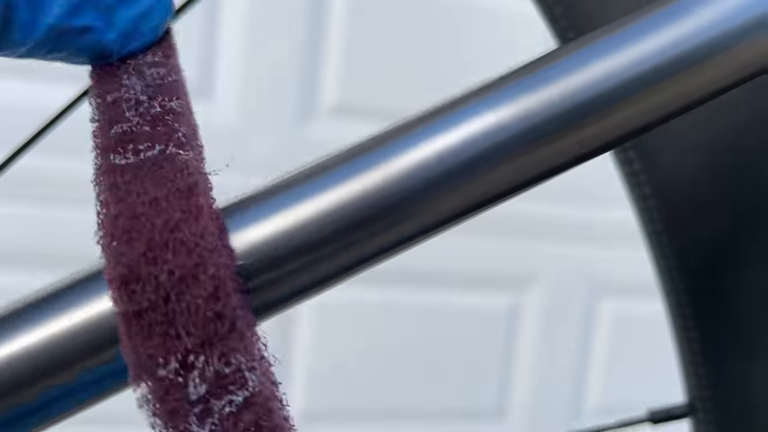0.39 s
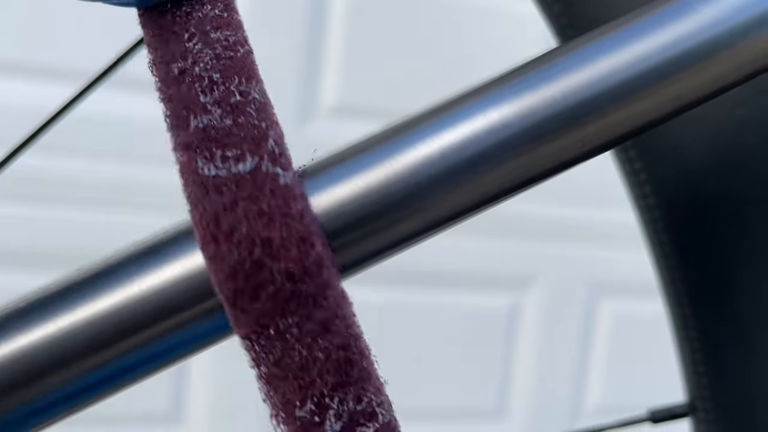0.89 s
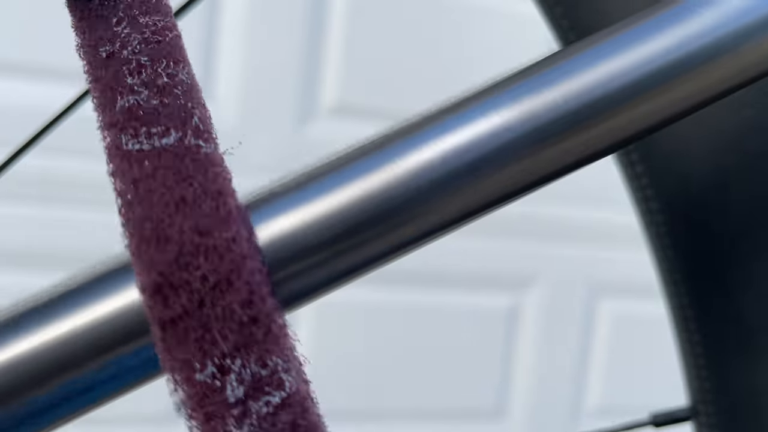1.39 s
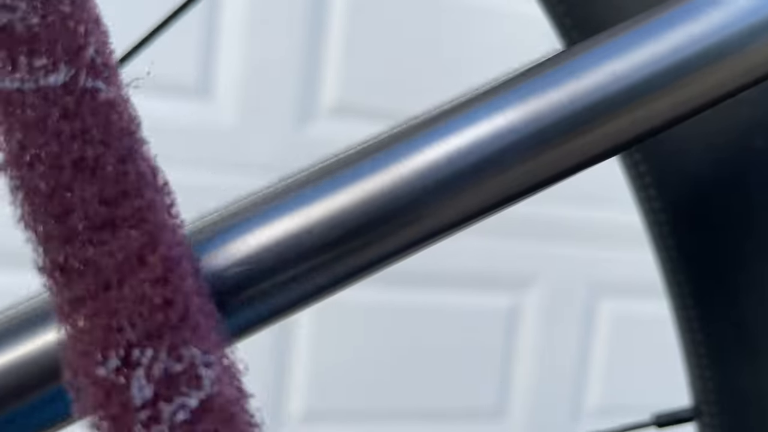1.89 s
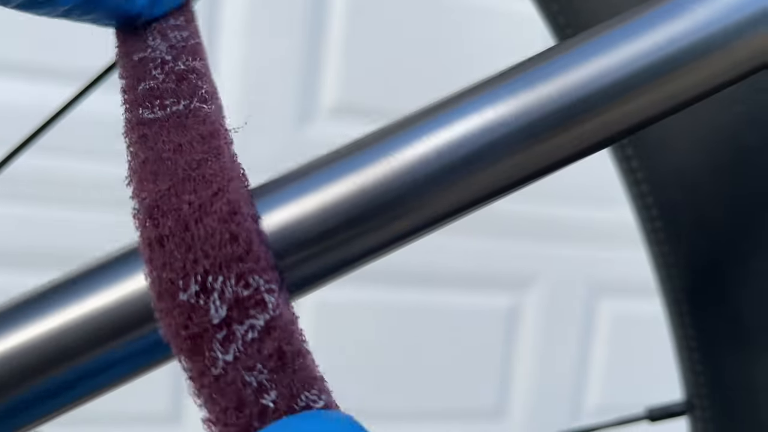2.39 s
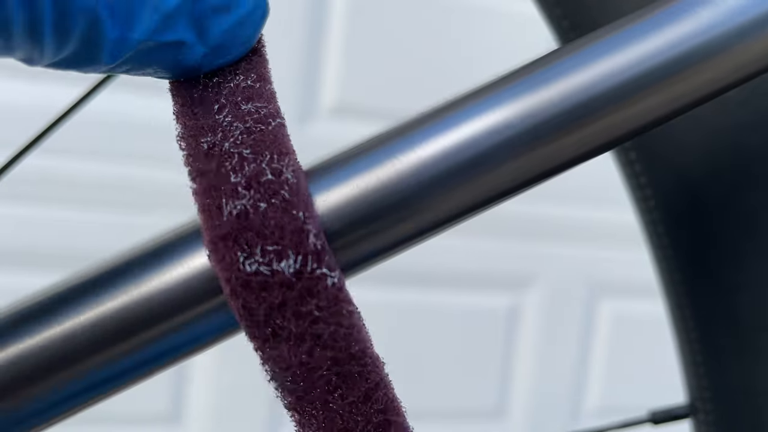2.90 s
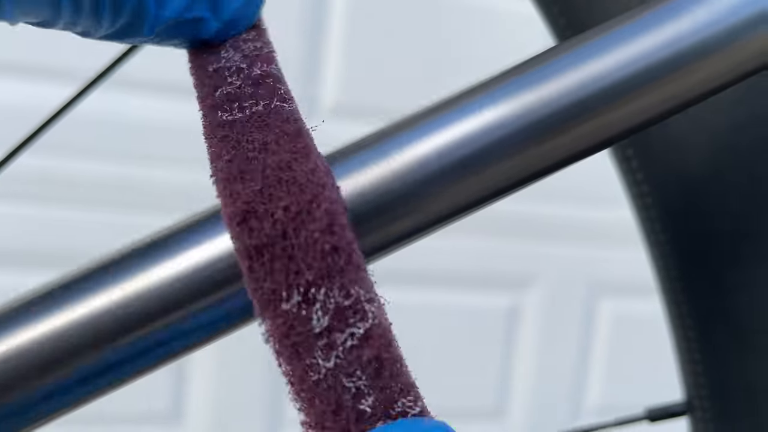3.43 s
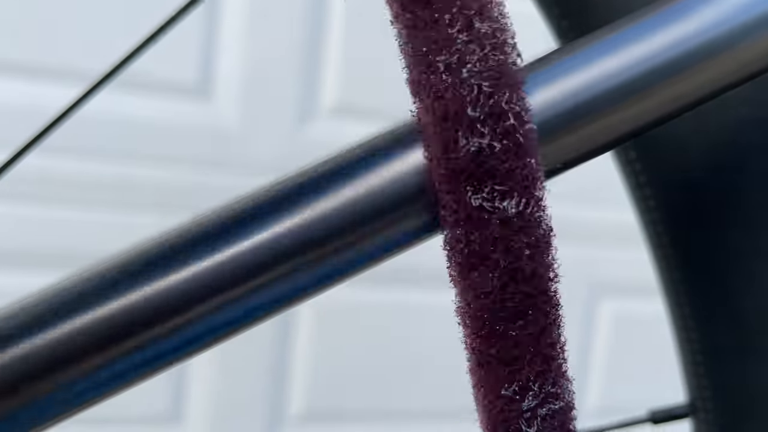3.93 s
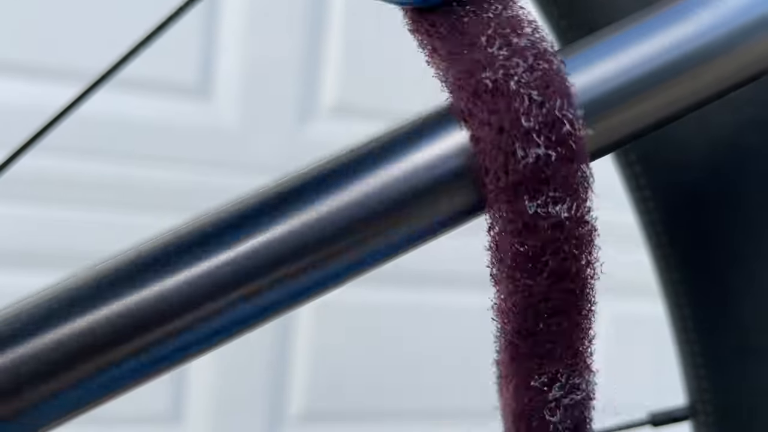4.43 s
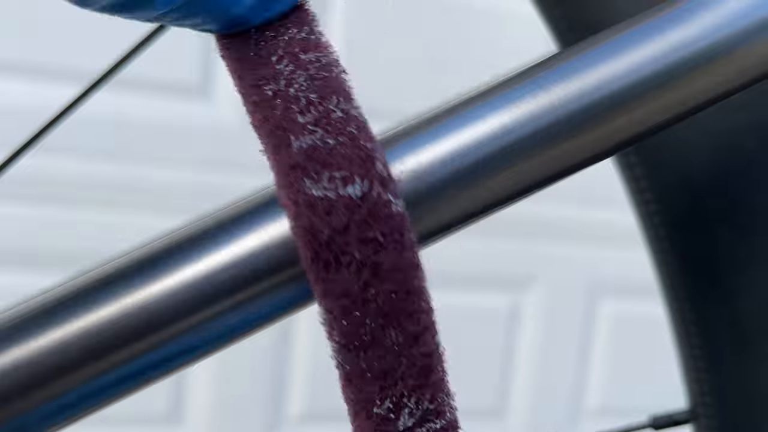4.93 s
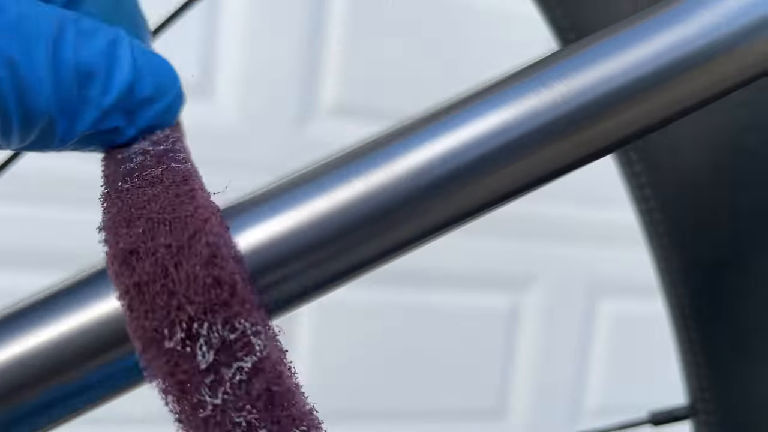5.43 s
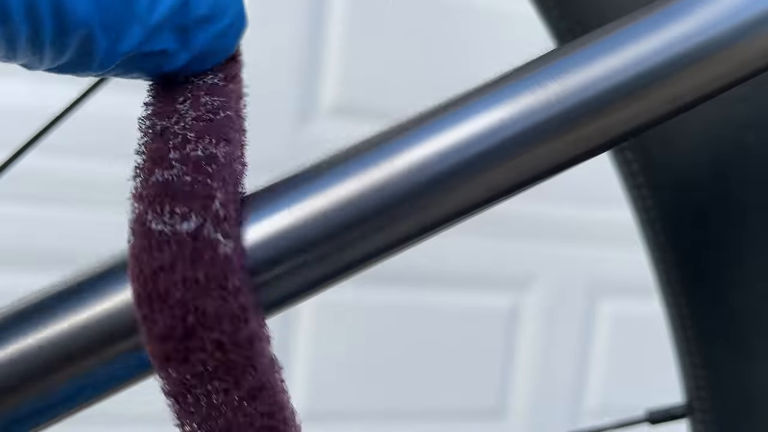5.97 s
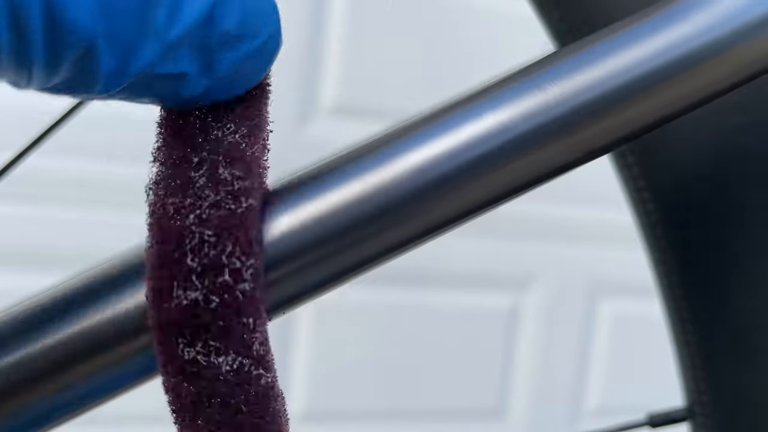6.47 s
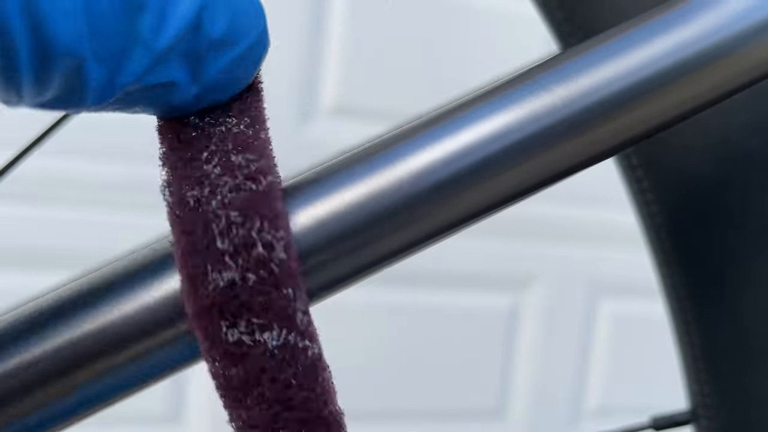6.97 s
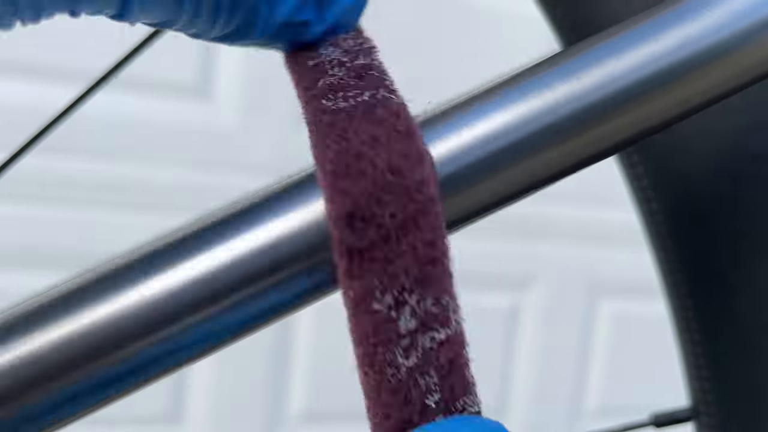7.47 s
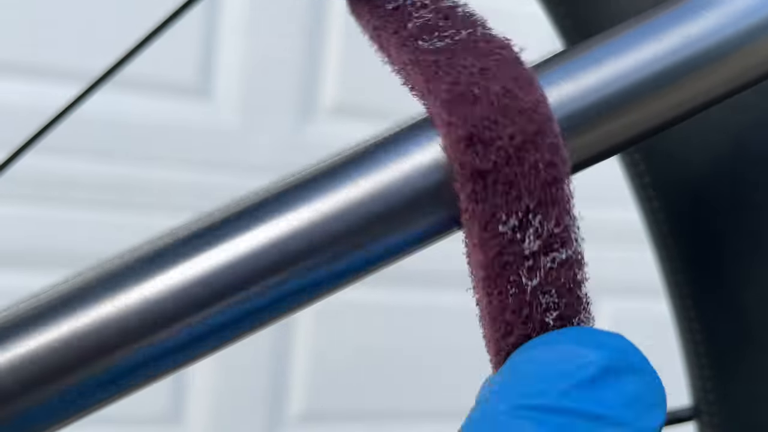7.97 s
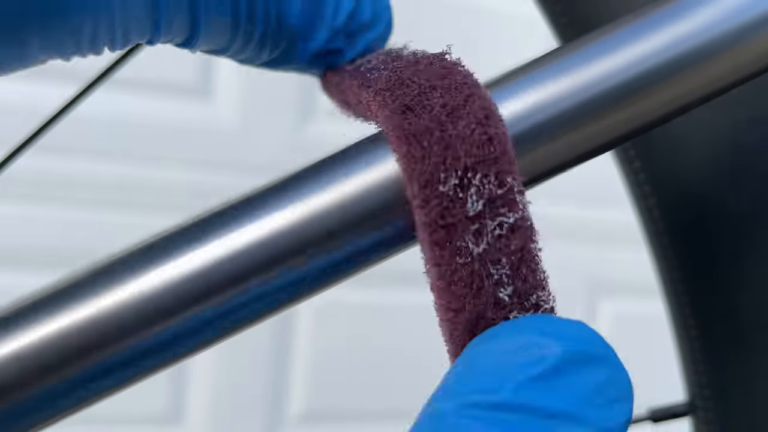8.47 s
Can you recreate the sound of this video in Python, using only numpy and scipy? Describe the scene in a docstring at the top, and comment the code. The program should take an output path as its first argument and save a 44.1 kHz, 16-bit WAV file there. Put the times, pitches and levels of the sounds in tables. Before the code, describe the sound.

An abrasive pad scrubs rapidly back and forth on a thin metal tube, bright ringing hiss, one brief pause, faint distant traffic rumbling behind.

```python
"""Within earshot of far traffic, an abrasive pad is pulled to and fro across a thin metal tube,
about nine strokes a second, close to two microphone ports.
Shaped noise is the grit's hiss; the same kind of noise drives resonances, the modes of the tube wall.
Fibres tick as brief noise puffs, two light taps are decaying sines, and the traffic is
slowly swelling noise with a few wavering sines for engine drones."""
import sys
import numpy as np
from scipy import signal
from scipy.fft import rfft, irfft, next_fast_len
from scipy.io import wavfile
from scipy.ndimage import uniform_filter1d, map_coordinates

SR = 44100
rng = np.random.default_rng(int(sys.argv[2]) if len(sys.argv) > 2 else 0)


def waveform_to_disk(signal):
    """Save audio, clipped to [-1, 1], as 16-bit WAV at the path in sys.argv[1]."""
    frames = np.transpose(np.atleast_2d(signal))
    scaled = np.clip(frames, -1, 1) * 32767
    samples = np.round(scaled).astype(np.int16)
    wavfile.write(sys.argv[1], SR, samples)


def convert_level_to_amplitude(level_db):
    """Map a level in decibels to its linear amplitude factor."""
    exponent = np.asarray(level_db, float) / 20
    return 10 ** exponent


N = 379701
SIZE = next_fast_len(N + 8192)  # transform length [samples], with room for decays
HZ = np.fft.rfftfreq(SIZE, 1 / SR)
TIME = np.arange(N) / SR


def unit(x):
    """Normalisation of the effective value: scaled to rms 1."""
    return x / np.sqrt(np.mean(x ** 2) + 1e-20)


def along(points):
    """Logarithmic frequency scale: columns of (frequency [Hz], value, ..) interpolated on it."""
    hz, *columns = np.transpose(points)
    return np.squeeze([np.interp(np.log(HZ + 1), np.log(hz + 1), column) for column in columns])


def curves(rows):
    """Linear interpolation in time: one value per sample for each column after the time."""
    s, *columns = np.transpose(rows)
    return [np.interp(TIME, s, column) for column in columns]


def wobble(rate):
    """Band-limited random modulation: a smooth curve through rate random knots a second."""
    knots = rng.standard_normal(int(N / SR * 2000))
    return map_coordinates(knots, [TIME * rate])


def filtered(x, response):
    """Linear filtering: the spectrum of x times a complex response of frequency."""
    return irfft(rfft(x, SIZE) * response, SIZE)[..., :N]


def band_gain(response, lo_hz, hi_hz):
    """Parseval's theorem: the rms that white noise of rms 1 keeps between two frequencies."""
    band = (HZ > lo_hz) & (HZ < hi_hz)
    return np.sqrt(np.sum(np.abs(response[band]) ** 2) / len(HZ))


def ports(pair, table):
    """Interchannel coherence: a shared and an opposed part mix to a given likeness and phase lead."""
    # channel balance: (frequency [Hz], left over right [dB])
    balance = [(60, -.6), (110, -1.3), (200, 0), (700, 2.2), (2400, 1.3), (4400, 1.7), (7800, 1.5),
               (8600, .2), (12500, 0)]
    alike, lead = along(table)
    turn = np.arccos(np.clip(alike, 0, 1)) / 2
    shared, own = rfft(pair, SIZE) * [np.cos(turn), np.sin(turn)]
    tilt = convert_level_to_amplitude(along(balance) / 2) * np.exp(.5j * lead)  # half the difference goes to each channel
    left, right = (shared + own) * tilt, (shared - own) / tilt
    return irfft([left, right], SIZE)[:, :N]


def wash(table):
    """Spectral shaping of white noise: two unrelated coloured noises of joint rms 1."""
    return unit(filtered(rng.standard_normal((2, N)), convert_level_to_amplitude(along(table))))


def traffic():
    """Superposed distant sources: swelling noise bands, and tones wavering in pitch and strength."""
    # mean tyre roar: (time [s], level [dB])
    roar_levels = [(0, -48.5), (.3, -46), (1.4, -44.5), (3.5, -44.5), (4.4, -44.5), (5, -44.5),
                   (6.5, -44.5), (8.61, -44.5)]
    # low rumble, tyre roar and the roar's faint top: (frequency [Hz], relative density [dB per Hz])
    rumble_colour, roar_colour, roar_top = [(20, -31), (30, -40), (40, -7.5), (55, 0.5), (80, -1),
                                            (105, -6), (180, -8), (280, -12.5), (400, -19.5), (600, -61)], [(250, -25), (400, -11), (600, -3.5), (700, -4),
                                                            (780, 0.5), (860, -3), (950, -1.5), (1050, -7),
                                                            (1200, -11), (1600, -15), (2000, -23),
                                                            (2700, -26.5), (3500, -33.5)], [(5000, -36), (5700, -49),
                                                                          (7500, -63), (10000, -65),
                                                                          (12500, -61), (14500, -73)]
    # engine drones: (start [s], end [s], mean frequency [Hz], mean level [dB]); end before start is silent
    drones = [(-.5, 6.5, 90, -49), (0, 4.2, 113, -52), (6.5, 9, 114, -50), (-.5, 3.1, 157, -54.5),
              (2.5, 3.77, 151, -46.5), (4, 5.4, 158, -53.5), (2.5, 5.3, 180, -57), (4.8, 9, 54, -49.5),
              (3, 6.5, 80, -47.5), (9.5, 7, 60, -43)]
    rumble_db, rumble_swing_db = 1, 2  # over the roar; its own slow swells
    fade_s = 0.14  # centred on each drone's start and end
    roar_db, = curves(roar_levels)
    rumble_level = convert_level_to_amplitude(roar_db + rumble_db + rumble_swing_db * wobble(1.51))
    roar_level = convert_level_to_amplitude(roar_db + 0.78 * wobble(13))
    sound = rumble_level * wash(rumble_colour) + roar_level * wash(roar_colour + roar_top)
    for start, end, hz, db in drones:
        fade = np.clip(np.minimum(TIME - start, end - TIME) / fade_s + .5, 0, 1)
        level = fade * convert_level_to_amplitude(db + 1.9 * wobble(4.5))
        phase = 2 * np.pi * np.cumsum(hz + 0.58 * wobble(8)) / SR
        sound[0] += level * np.sin(phase)  # the part shared by both channels
    return sound


def ticks():
    """Impulsive release of stored strain: each freed fibre is a noise puff that decays 60 dB in 3 ms."""
    # fibres letting go: (time [s], onset level before colouring [dB])
    releases = [(0.0179, -47), (0.0284, -59), (0.0448, -53), (0.0947, -50), (0.1161, -60), (0.1531, -50),
                (0.2339, -53), (0.2538, -51), (1.7784, -50), (1.8084, -51), (1.8542, -50), (1.8608, -57),
                (1.8671, -31), (1.8798, -50), (1.8894, -52), (1.9025, -37), (1.9769, -61)]
    # colour of a tick: (frequency [Hz], relative density [dB per Hz])
    fibre_colour = [(2000, -20), (6000, -11), (10000, -4), (13000, 0), (16000, -3)]
    faint_per_s, faint_db, faint_spread_db = 40, -70, 3  # faint ticks at random times throughout
    out, t = np.zeros((2, N + 220)), np.arange(220) / SR
    draw = rng.random((int(faint_per_s * N / SR), 2))
    faint_s = draw[:, 0] * N / SR
    faint_levels = faint_db - faint_spread_db * np.log(draw[:, 1] + .05)  # few are strong
    for s, db in [*releases, *zip(faint_s, faint_levels)]:
        puff = convert_level_to_amplitude(db - 60 * t / .003) * rng.standard_normal((2, len(t)))
        out[:, round(s * SR):][:, :len(t)] += puff
    return filtered(out[:, :N], convert_level_to_amplitude(along(fibre_colour)))


def knock():
    """Free decay of one mode: a touch rings the tube before the first stroke, a dull tap falls within one."""
    # taps: (time [s], onset level [dB], frequency [Hz], 60 dB decay time [s])
    taps = [(0.246, -54, 3880, 0.47), (5.206, -35.5, 2300, .008)]
    out, t = np.zeros((2, N)), np.arange(SR // 5) / SR
    for s, db, hz, t60 in taps:
        out[0, round(s * SR):][:len(t)] += convert_level_to_amplitude(db - 60 * t / t60) * np.sin(2 * np.pi * hz * t)
    return out


def strokes():
    """Sliding friction: force swells with speed and sinks at each turn; upper, hiss and lower drives."""
    # strokes, each lasting to the next turn: (turn time [s], force [dB], drive left in the turn [dB])
    stroke_rows = [(0.275, -60, -41), (0.342, -53.5, -30), (0.45, -56.5, -30), (0.553, -54, -18),
                   (0.657, -54, -30), (0.759, -54, -13), (0.864, -54, -30), (0.961, -53, -13),
                   (1.063, -55, -10), (1.158, -53.5, -18), (1.262, -55.0, -16), (1.361, -54.5, -25),
                   (1.47, -54.5, -14), (1.572, -54, -27), (1.669, -60.5, -26), (1.79, -93, -40),
                   (1.985, -60.5, -37), (2.078, -55, -15), (2.189, -53, -15), (2.297, -52, -15),
                   (2.401, -51, -33), (2.508, -51.5, -11), (2.619, -51, -35), (2.728, -53.5, -12),
                   (2.832, -52.5, -45), (2.94, -51.5, -24), (3.041, -53.4, -44), (3.142, -53.5, -12),
                   (3.241, -52.6, -38), (3.347, -52, -21), (3.453, -53, -38), (3.554, -53.5, -18),
                   (3.656, -53, -23), (3.76, -53.5, -17), (3.858, -54.5, -28), (3.976, -56, -10),
                   (4.08, -55, -26), (4.202, -54, -17), (4.322, -53.5, -34), (4.443, -51, -18),
                   (4.554, -54, -29), (4.669, -51, -15), (4.79, -52.5, -29), (4.906, -51, -14),
                   (5.015, -52, -36), (5.126, -50, -37), (5.237, -49.5, -29), (5.351, -49.5, -34),
                   (5.458, -50.9, -37), (5.565, -49.5, -26), (5.682, -50.5, -44), (5.8, -49.5, -37),
                   (5.909, -52, -34), (6.028, -51, -31), (6.14, -50.5, -32), (6.254, -52, -9.5),
                   (6.371, -50, -34), (6.489, -52.5, -13), (6.617, -51.5, -37), (6.725, -52, -41),
                   (6.841, -51, -24), (6.96, -50.5, -34), (7.073, -50.5, -33), (7.184, -50.5, -19),
                   (7.301, -50, -31), (7.413, -52.5, -4.5), (7.531, -54, -20), (7.648, -53.5, -13),
                   (7.758, -55, -10), (7.92, -54.5, -10), (8.024, -53.5, -32), (8.146, -54.5, -10.5),
                   (8.263, -52.6, -36), (8.381, -53.2, -30), (8.498, -54.5, -19), (8.62, -53, -32)]
    # the hand rests: (start [s], end [s])
    rest_start, rest_end = (1.795, 1.98)
    # the pad wanders along the tube, which changes how well it drives the wall:
    # (time [s], upper ring over hiss [dB], lower ring over hiss [dB])
    place = [(0, 14.5, 0), (1.7, 15.5, 3), (2.4, 13.5, 0.5), (3.6, 14, 2), (4.4, 14.5, -1),
             (5.4, 12.5, 0.5), (6.1, 13, 0), (7.3, 13.5, 0), (8.6, 15.5, -0.5)]
    # growth with speed: (upper ring, hiss, lower ring) [exponent]
    growth = (0.6, 0.47, 0.35)
    pull_peak, push_peak = 0.55, 0.63  # where a stroke is fastest, share of its length
    start_peak, stop_peak = 0.72, 0.26  # the same for a stroke out of rest and one into rest
    dwell = 0.088  # under this share of full speed the grit sticks
    scatter_db = 2  # ring strength from stroke to stroke
    turn, force_db, left_db = np.transpose(stroke_rows)
    turn = turn - .004  # the hand turns a little before the ringing is at its quietest
    halt = np.searchsorted(turn, rest_start)
    fastest = np.where(np.arange(len(turn)) % 2, push_peak, pull_peak)
    fastest[[0, halt]], fastest[halt - 2] = start_peak, stop_peak
    k = np.clip(np.searchsorted(turn, TIME) - 1, 0, len(turn) - 2)  # stroke under way
    progress = np.clip((TIME - turn[k]) / np.diff(turn)[k], 0, 1)
    warp = np.log(.5) / np.log(fastest[k])  # puts the sine's crest at the fastest point
    speed = np.abs(np.sin(np.pi * progress ** warp))
    slip = np.clip((speed - dwell) / (1 - dwell), 0, 1)
    left = np.interp(TIME, turn, convert_level_to_amplitude(left_db))
    moving = (TIME > turn[0]) * ((TIME < rest_start) | (TIME > rest_end))
    scatter = scatter_db * rng.standard_normal((len(turn), 2))
    upper_db, lower_db = curves(place) + scatter[k].T
    drives = []
    for db, power in zip((upper_db, 0, lower_db), growth):
        drive = moving * (left + (1 - left) * slip ** power) * convert_level_to_amplitude(force_db[k] + db)
        drives.append(uniform_filter1d(drive, size=220))  # 5 ms smoothing
    return drives


def flutter(rough_db):
    """Stick-slip in clumps: grains catch on the metal together, so their joint strength flutters."""
    return unit(convert_level_to_amplitude(rough_db * (wobble(600) + 1.1 * wobble(70))))


def ringing(modes, force, band, rough_db, shift_db):
    """Modal superposition: grain noise drives damped resonances, each varying by shift_db over its nodes."""
    shapes = [convert_level_to_amplitude(db) * 1j * HZ * width / (centre * centre - HZ * HZ + 1j * HZ * width)
              for centre, width, db in modes]
    drive = force * flutter(rough_db)
    total = 0
    for shape in shapes:
        grains = rng.standard_normal((2, N))  # each mode has its own share of the grains
        total = total + rfft(drive * convert_level_to_amplitude(shift_db * wobble(12)) * grains, SIZE) * shape
    gain = band_gain(np.linalg.norm(shapes, axis=0), *band)  # the band sets the ring level
    return irfft(total, SIZE)[:, :N] / gain


def pad():
    """Friction-excited vibration: the grit hisses directly and drives both families of tube modes."""
    # tube wall modes, upper and lower family: (frequency [Hz], bandwidth [Hz], relative level [dB])
    upper_modes, lower_modes = [(10382, 45, 0), (10492, 45, -2), (10705, 60, -8), (11062, 55, -6),
                                (11558, 80, -15), (12317, 65, -13.5), (12910, 100, -24), (13460, 120, -20),
                                (14893, 80, -15.5)], [(2580, 150, -18), (3330, 80, -15), (3530, 45, -8),
                                               (3640, 55, 0), (3880, 60, -1), (4210, 42, -3),
                                               (5050, 150, -16), (5340, 120, -14)]
    # grit hiss: (frequency [Hz], relative density [dB per Hz])
    grit_colour = [(1500, -6), (2500, -24), (4500, -8.5), (5300, -13), (5600, -25), (5950, -3.5),
                   (7000, -5.5), (8000, -1.5), (9000, -2.5), (9900, 3), (11400, 2.5), (12000, 0.5),
                   (13200, -0.5), (14300, 1), (15000, 0), (15700, -9)]
    upper, hiss, lower = strokes()
    colour = convert_level_to_amplitude(along(grit_colour))
    grains = hiss * flutter(rough_db=0.93) * rng.standard_normal((2, N))
    sound = filtered(grains, colour / band_gain(colour, 12700, 14200))  # band of the hiss level
    sound += ringing(upper_modes, upper, (10100, 11300), rough_db=1.5, shift_db=0.0)
    return sound + ringing(lower_modes, lower, (3450, 4350), rough_db=1.4, shift_db=1.7)


def scene():
    """Superposition: taps, pad and fibres share one stereo image, the far traffic has another."""
    # stereo image of the close sounds and of the traffic, as heard in the two channels; the close one
    # is nearly opposed in phase at 8.3-9.3 kHz and the same in both channels above 12.8 kHz:
    # (frequency [Hz], likeness [0-1], left leads [rad])
    close_image, far_image = [(2500, .3, 0), (3600, .7, 1.4), (4300, .55, 1.8), (4700, .3, .8),
                              (5050, .3, 1), (5350, .5, 3), (5900, .35, 4.6), (6500, .6, 6), (7200, .35, 5),
                              (7700, .6, 3.2), (8300, .88, 3.14), (9300, .88, 3.14), (9900, .85, 2.35),
                              (10500, .97, 2.1), (11500, .75, 1.4), (12200, .85, .7), (12600, .93, .3),
                              (12850, 1, 0)], [(60, .97, 0), (90, .93, 0), (150, .88, 0), (220, .73, .2),
                                            (300, .33, .3), (420, .05, 1.6), (550, .4, 2.7),
                                            (900, .55, 3.3), (1100, .63, 3.3), (1400, .33, 3.8),
                                            (1700, .3, 3.6), (2000, .2, 4.4), (2400, .33, 6), (2900, 0, 6)]
    return ports(traffic(), far_image) + ports(ticks() + knock() + pad(), close_image)


def roll_off(x):
    """The treble ends steeply here."""
    return signal.sosfilt(signal.butter(12, 15800, fs=SR, output="sos"), x)


def record(dry):
    """Band limitation: a steep low-pass removes everything above its edge."""
    top_hz = 15780
    mix = filtered(dry, HZ < top_hz)
    return roll_off(mix)


dry = scene()
out = record(dry)
waveform_to_disk(out)
```